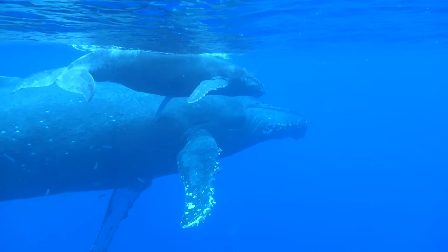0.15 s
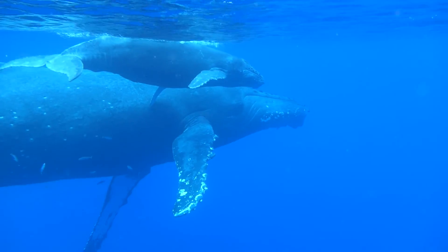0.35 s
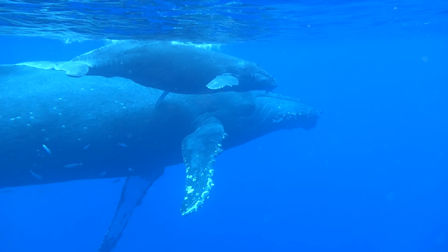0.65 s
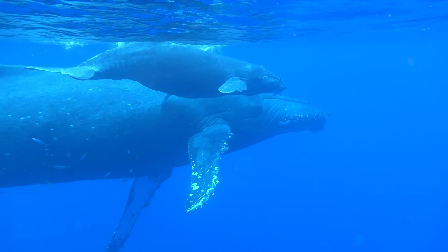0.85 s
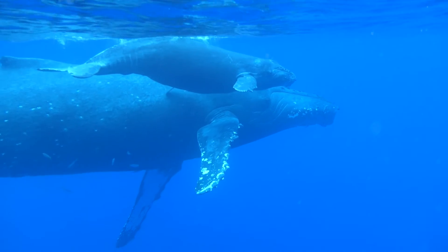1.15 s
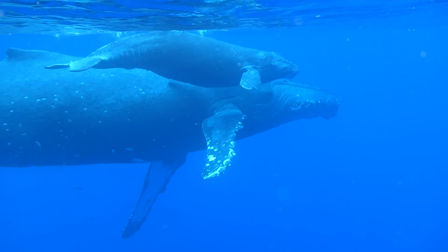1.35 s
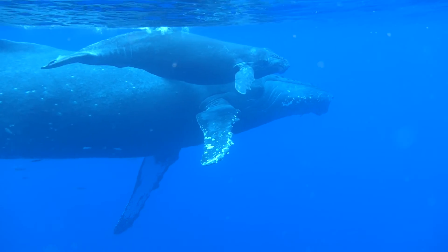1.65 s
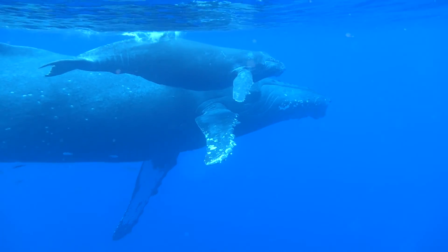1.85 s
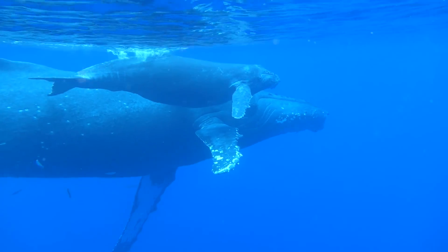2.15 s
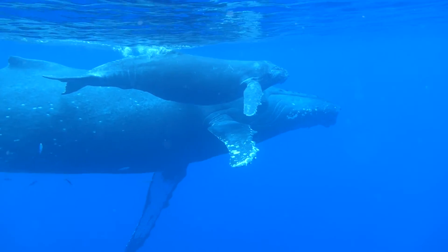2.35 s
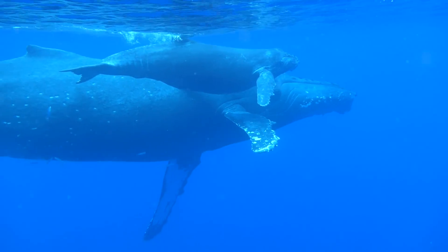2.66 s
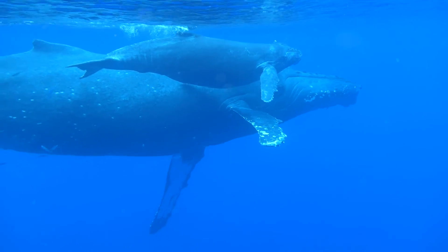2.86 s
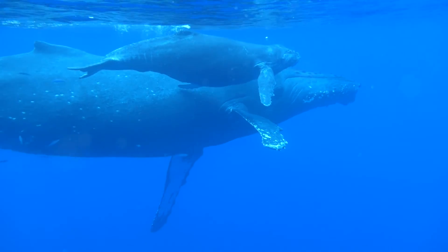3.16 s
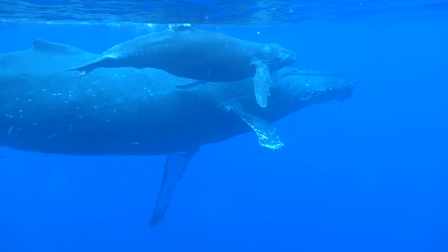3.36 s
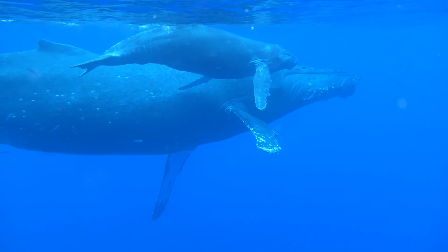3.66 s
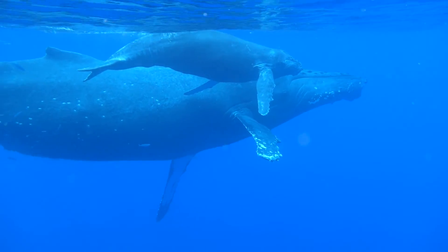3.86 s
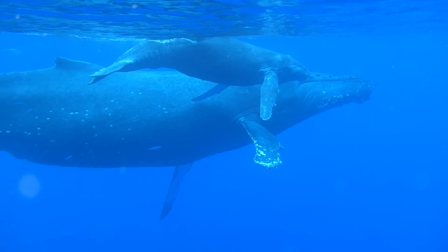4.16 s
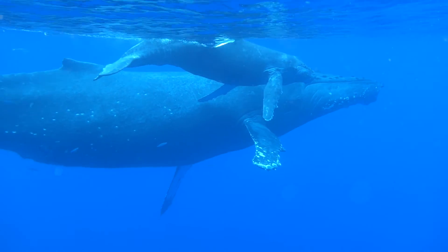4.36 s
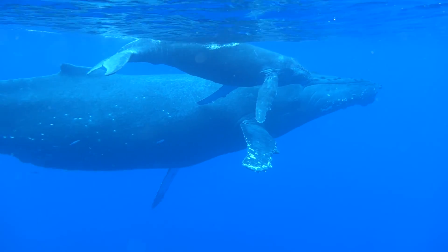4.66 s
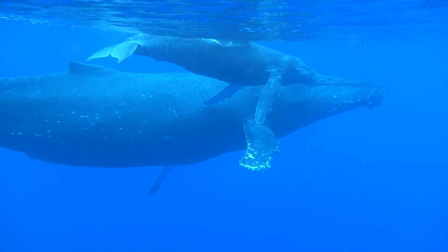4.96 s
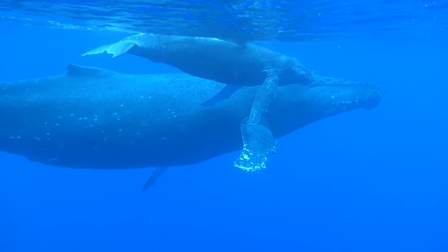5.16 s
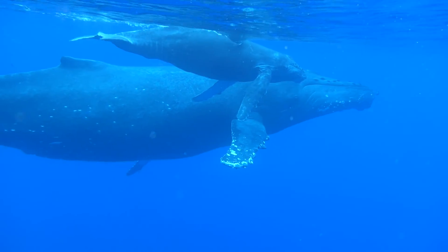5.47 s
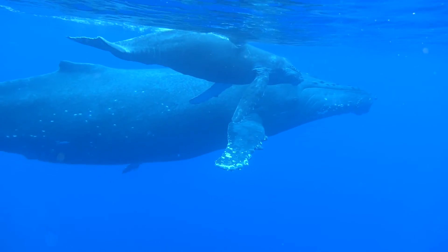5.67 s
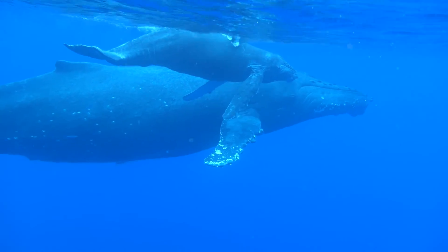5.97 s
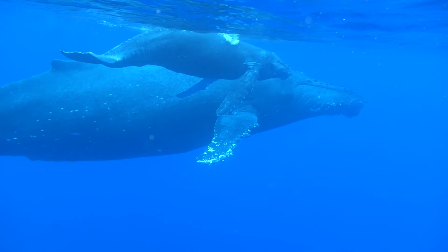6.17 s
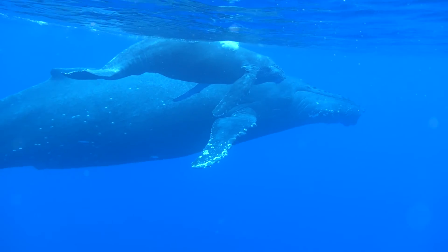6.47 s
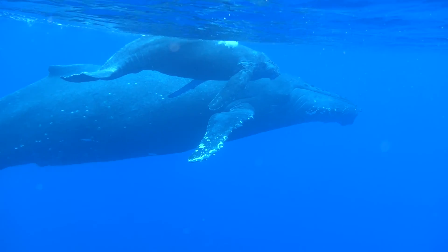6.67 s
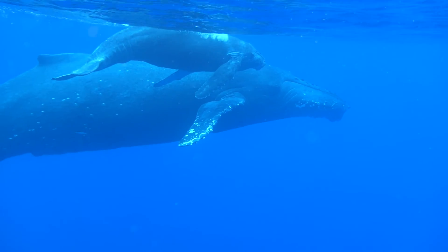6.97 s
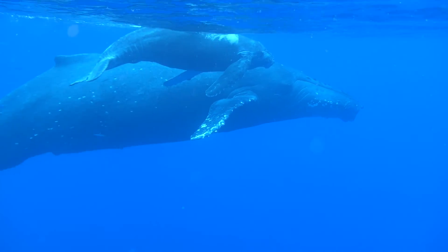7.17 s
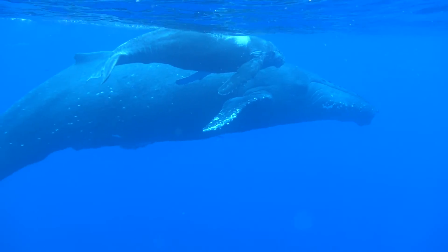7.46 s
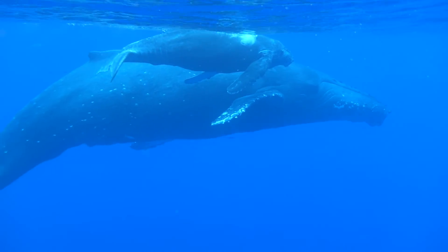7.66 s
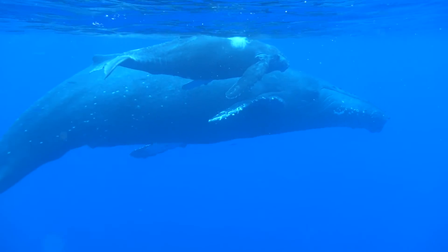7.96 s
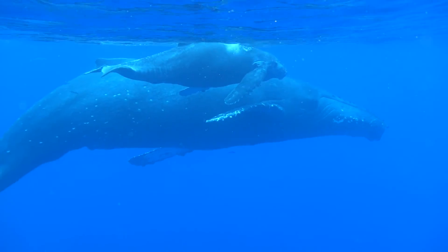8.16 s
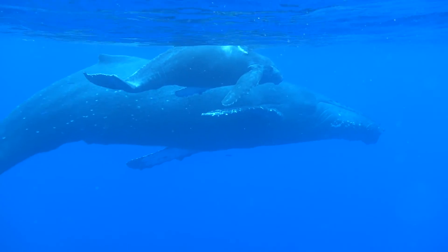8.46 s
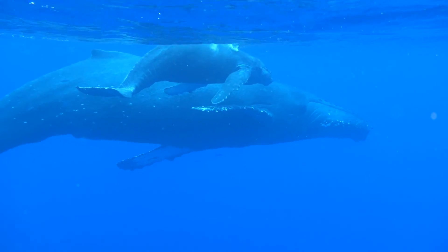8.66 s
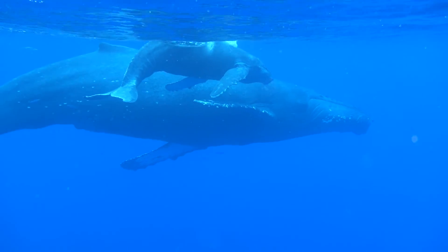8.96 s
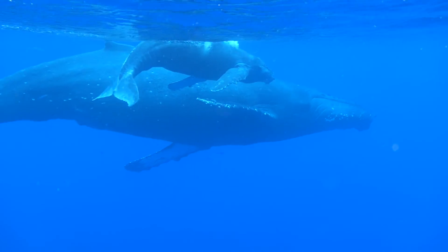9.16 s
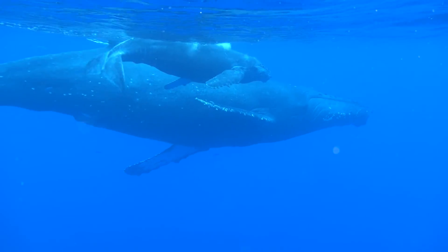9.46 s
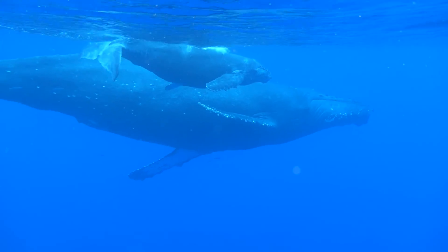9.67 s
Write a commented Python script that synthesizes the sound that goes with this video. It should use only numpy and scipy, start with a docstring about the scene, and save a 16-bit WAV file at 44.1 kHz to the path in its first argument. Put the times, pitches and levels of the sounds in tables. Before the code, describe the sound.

Underwater near the surface, a humpback whale gives a hollow whoop that sweeps upward in steps and turns hoarse at the top. After a gap of dull water knocks and bubble pops, a low pulsing growl speeds into a rattle. Late on, a second rising whoop comes with a faint high cry. Far whale chorus, thin hiss and fine crackle continue throughout, heard through a camera housing.

```python
"""The open sea just below the surface, where humpback whales are heard at a camera housing with two ports.
Behind them lie a far chorus and hiss (shaped noise), laps (noise swells) and a crackle (tiny pings). Water
knocks and burbles on the housing as short decaying rings, and bubbles pop close by. Two whoops glide upward,
their overtones filtered by throat resonances; the second's end is followed by a faint rising echo. Between them
a growl's quickening pulses ring the chest and the mouth. Short echoes follow the whales."""
import sys
import numpy as np
from scipy import signal
from scipy.fft import rfft, irfft, next_fast_len
from scipy.io import wavfile
from scipy.ndimage import uniform_filter1d

SR = 44100
rng = np.random.default_rng(int(sys.argv[2]) if len(sys.argv) > 2 else 0)


def to_wav(sig):
    """Store sig (one row per channel, or 1-D mono) as 16-bit WAV at the path in sys.argv[1].

    Samples outside -1..1 are clipped; the rate is SR.
    """
    pcm = np.clip(np.atleast_2d(sig), -1, 1) * 32767
    pcm = np.round(pcm).astype(np.int16)
    wavfile.write(sys.argv[1], SR, pcm.T)  # frames by channels


N = 433058

# Spectrum of the far chorus. Each row: frequency in Hz, relative density in dB.
CHORUS_SPECTRUM = [(24, -80.5), (40, -34.5), (345, -14.5), (372, -3), (413, -19.5), (453, -5.5),
                   (527, -1.5), (595, -8), (724, -6), (869, -15.5), (1010, -2.5), (1500, -25), (1950, -82),
                   (3300, -120)]
# Favourite notes of the chorus. Each row: frequency in Hz, width in Hz, prominence in dB.
CHORUS_NOTES = [(460.3, 15, 4), (546.7, 22.5, 6), (645, 50, 4.5), (889, 71, -9), (930, 58, 1)]
# Course of the far chorus. Each row: time in seconds, level in dB before swell and fades.
CHORUS_LEVEL = [(0, -36), (1.6, -37), (3.8, -37.5), (6.3, -36.5), (7.2, -38.5), (8.6, -36.5)]
# Brief fades of the background. Each row: deepest point in seconds, depth in dB.
FADES = [(.172, 8), (1.728, 7), (1.975, 9), (3.015, 4), (4.12, 13), (4.172, 6), (6.84, 12), (6.885, 5),
         (6.925, 4), (6.964, 12), (8.94, 5)]
# Spectrum of the hiss. Each row: frequency in Hz, relative density in dB.
HISS_SPECTRUM = [(1880, -10.5), (3200, -6), (3370, -8), (3610, 1.5), (3830, -9), (4370, -5), (4730, -9.5),
                 (5330, -5.5), (6900, -3.5), (9230, -8), (12700, -15), (14900, -17.5), (15600, -22.5)]
# Spectrum of the lapping surface. Each row: frequency in Hz, relative density in dB.
LAPPING_SPECTRUM = [(700, -36), (1050, -2), (1300, 4), (1500, 2.5), (1850, -0.5), (2100, -10.5), (2450, -8),
                    (2750, -8), (3050, -23), (3400, -37), (6000, -42.5)]
# Strongest laps of the surface. Each row: peak time in seconds, level in dB before fades and flutter.
LAPS = [(.21, -44.5), (1.25, -51), (2.01, -54), (2.66, -47), (3.11, -48), (3.66, -50), (3.79, -53),
        (4.54, -49), (6.25, -54), (6.42, -49), (6.47, -57), (6.64, -53), (6.76, -55), (7.14, -59),
        (7.48, -52), (7.85, -42.5), (8.66, -48), (8.86, -51), (8.98, -54), (9.07, -48), (9.79, -49)]
# Ports in a diffuse field. Each row: frequency in Hz, left minus right in dB, phase lead of the
# left in radians, likeness of the two from 0 to 1.
PORTS_FAR = [(100, -3.5, 3.0, 0.6), (210, -3.1, 2.9, 0.41), (320, -5.0, -0.2, 0.47),
             (440, -4.0, -0.7, 0.78), (570, -6.7, -1.0, 0.53), (720, 3.5, 0.1, 0.3), (1000, 4.4, -1.5, 0.8),
             (1250, -2.3, -0.1, 0.68), (1900, -4.5, -2.6, 0.27), (2500, -3.5, -0.0, 0.67),
             (2900, 1.5, 0.9, 0.38), (3550, -4.2, -0.2, 0.47), (5000, -1.6, 0.5, 0.37),
             (9000, 1.0, 0.3, 0.65), (14000, 1.9, 0.1, 0.4)]
# Ports for one direction. Each row: frequency in Hz, left minus right in dB, phase lead of the left in radians.
PORTS_NEAR = [(350, -4.3, -0.1), (600, -4.7, -0.0), (700, -0.5, 0.1), (800, -6.2, -0.7), (970, 4.3, -1.2),
              (1300, -6.8, -1.0), (1620, -13.0, 1.1), (2200, 1.0, -2.7), (2500, -5.1, -0.1),
              (2780, -4.1, 0.9), (3050, -6.4, 1.0), (5200, -2.1, 0.3), (9000, 1.3, 0.3)]
# Transmission of the housing, which passes little bass. Each row: frequency in Hz, gain in dB.
HOUSING = [(40, -33.5), (90, -13.5), (150, 3), (300, -2)]
# Water knocking on the housing. Each row: time in seconds, relative level in dB, ring in Hz.
KNOCKS = [(0.239, -25.5, 360), (2.339, -17, 360), (2.512, -34, 340), (2.531, -26, 344), (2.573, -19, 350),
          (2.827, -27, 370), (2.939, -29, 360), (3.297, -20, 354), (3.327, -30, 340), (3.967, -25, 346),
          (4.428, -29, 340), (6.272, -32.5, 380), (7.152, -30, 340), (7.746, -31.5, 350), (7.781, -29, 347),
          (7.845, -27.5, 380), (8.384, -23.5, 384), (8.545, -24, 314), (8.989, -35, 360),
          (9.064, -35.5, 340)]
# Bubbles popping close by. Each row: start in seconds, relative level in dB, pitch in Hz.
POPS = [(0.7015, -30, 2544), (3.5402, -35, 2540), (3.547, -46, 2470), (3.5527, -37, 2550),
        (3.581, -48, 2470), (3.859, -41.5, 2520), (3.866, -42.5, 1580), (4.89, -33, 2360),
        (7.1527, -43, 2420), (7.206, -40.5, 2450), (8.7223, -43, 2490)]
# Nearest snaps of the crackle. Each row: start in seconds, relative level in dB, centre in Hz.
SNAPS = [(0.6348, -46.5, 9000), (1.591, -49, 10300), (2.744, -48, 3240), (3.539, -45, 3600),
         (3.5523, -43.5, 9300), (3.569, -50, 8400), (4.9801, -46.5, 8650), (5.8843, -49, 8450),
         (6.8813, -54, 10800), (6.972, -50.5, 8100), (7.435, -53, 5200), (7.745, -50, 3900),
         (8.135, -50, 5200), (8.4926, -51, 9250)]
# Echo colour: the rippled surface returns less treble. Each row: frequency in Hz, gain in dB.
ECHO_COLOUR = [(400, 5), (800, -1), (1500, -4.5), (2500, -3), (5000, -6)]
# Faint rising echo of the second whoop's end, made as a wavering tone. Each row: time in seconds, mean pitch in
# Hz, level in dB before flutter.
END_ECHO = [(8.59, 967, -45), (8.63, 1330, -36.5), (8.68, 1610, -50)]
# Pulse rate of the growl, which quickens. Each row: time in seconds, pulses per second.
GROWL_RATE = [(4.583, 19.5), (4.787, 19.5), (4.984, 21.1), (5.134, 32.2), (5.35, 32.6), (5.637, 37.1),
              (5.805, 46.2), (5.887, 51.4), (5.942, 57.7), (6.09, 62)]
# Growl resonances: the chest sags, then turns up towards the mouth. Each row: time in seconds,
# chest in Hz, chest level in dB, mouth in Hz, mouth level in dB.
GROWL_RESONANCES = [(4.58, 256, -77, 380, -45.5), (4.78, 243, -74, 372, -44),
                    (4.86, 231, -64.5, 374, -39.5), (4.98, 223, -52, 397, -39), (5.2, 214, -55, 413, -46),
                    (5.42, 224, -47, 444, -54.5), (5.6, 202, -47.5, 450, -61), (5.73, 220, -44.5, 458, -49),
                    (5.81, 250, -40, 460, -50), (5.89, 312, -39, 470, -44), (5.97, 380, -42.5, 462, -38.5),
                    (6.09, 440, -54, 510, -48)]
# Effort of the growl: it builds, peaks in a last push and lets go. Each row: time in seconds,
# effort in dB, level of the low throat resonance in dB.
GROWL_EFFORT = [(4.58, -24, -70), (4.75, -18, -54), (4.79, -9, -50), (4.98, -8, -58), (5.25, -5, -62),
                (5.47, -5, -42), (5.56, -4.5, -56), (5.72, -8, -53), (5.85, 3, -52.5), (5.98, -2, -53),
                (6.05, -28, -72)]
# Cracks of the hardest pulses. Each row: start in seconds, level in dB.
GROWL_CRACKS = [(5.385, -50), (5.584, -42), (5.807, -41), (5.851, -45), (5.872, -51)]
# Colour of the growl's rattle. Each row: frequency in Hz, gain in dB.
RATTLE_COLOUR = [(100, -24), (220, 12.5), (450, 19), (850, 6), (1200, 12.5), (1620, -14), (2050, -4.5),
                 (2500, 11.5), (2780, -9), (3030, 3.5), (3400, -25), (4400, -19), (5150, -15.5),
                 (5800, -22), (12000, -34)]
# Two whoops, each climbing to a ledge, leaping and breaking upward once more. Each row: time in seconds,
# mean pitch in Hz, relative fundamental in dB, then the relative overtones in dB in the low, middle
# and high throat resonance.
FIRST_WHOOP = [(0.25, 155.5, -59, -57.5, -59, -70), (0.31, 188.8, -47.5, -49.5, -64, -69),
               (0.365, 223, -36.5, -43.5, -49, -67), (0.425, 277.5, -36, -42.5, -52, -62),
               (0.46, 304.4, -30, -57, -53, -62), (0.495, 320.8, -30, -47.5, -49.5, -63),
               (0.595, 323.5, -30, -58.5, -55, -56), (0.622, 337.6, -31, -45, -53, -55),
               (0.645, 352.3, -24, -48, -57, -64), (0.69, 404.3, -22.5, -54.5, -55, -63),
               (0.748, 492.4, -22, -44.5, -64.5, -66), (0.775, 593.3, -29, -47, -52, -70.5),
               (0.808, 614.7, -20.5, -48, -41, -65), (0.86, 639, -24, -48, -49, -72),
               (0.915, 664.7, -20, -51.5, -56, -72), (0.948, 702, -22.5, -50, -51, -65),
               (0.965, 769, -31.5, -51.5, -49.5, -64), (1.003, 827, -34, -51.5, -45.5, -64),
               (1.03, 958, -30.5, -52, -54, -63), (1.08, 988, -38.5, -48.5, -68, -74)]
SECOND_WHOOP = [(7.86, 150.2, -65, -46, -68, -74), (7.915, 196.7, -52.5, -56, -68, -73),
                (7.945, 213.7, -45.5, -43, -52, -64), (7.98, 226, -39, -47.5, -57, -62),
                (8.045, 276, -37, -45, -56, -62), (8.12, 297.7, -33, -52.5, -62, -61),
                (8.16, 298.2, -31.5, -50, -61, -73), (8.215, 317.5, -26, -53, -54.5, -67),
                (8.286, 411.3, -14.5, -42.5, -64, -64), (8.303, 525, -32.5, -41.5, -47.5, -53),
                (8.335, 587, -28.5, -43, -47, -51), (8.385, 619, -22, -47.5, -50, -49),
                (8.441, 661, -24, -41.5, -40, -59), (8.452, 756, -28, -46, -50, -53),
                (8.475, 772, -28.5, -44, -54, -43.5), (8.508, 791, -37, -49.5, -48.5, -56),
                (8.535, 901, -28.5, -51, -47.5, -55), (8.565, 941, -46.5, -72, -59, -62),
                (8.605, 990, -38, -56, -57, -60), (8.67, 1035, -52, -54.5, -58, -61)]
# Treble ring of the whoops. Each row: time in seconds, relative level in dB.
TREBLE_RING = [(.3, -75), (.42, -74), (.5, -67), (.62, -70), (.74, -75), (1.05, -72.5), (8.22, -74),
               (8.35, -65), (8.5, -67.5), (8.62, -73)]
# Hoarseness of the voice. Each row: pitch in Hz, roughness from 0 to 1.
ROUGHNESS = [(170, .7), (240, .5), (310, .04), (335, .05), (420, .3), (530, .3), (610, .03), (745, .06),
             (830, .55), (950, .85)]
# Throat's low, middle and high resonance, then its treble ring. Each row: lower edge in Hz, upper edge in Hz.
THROAT_BANDS = [(800, 2050), (2050, 2800), (2800, 3700), (4400, 5700)]
# Colour of the overtones. Each row: frequency in Hz, gain in dB.
THROAT_COLOUR = [(100, -27), (330, -10), (470, -8), (620, 4), (900, -3.5), (1300, 1), (1620, -1),
                 (1850, -14.5), (2050, -17), (2500, -1.5), (2780, -15.5), (3050, -6.5), (3330, -32),
                 (3800, -28), (4300, -17.5), (4700, -23), (5200, -15.5), (6000, -25.5), (12000, -25)]
# Colour of the rasp, on top of the throat's. Each row: frequency in Hz, gain in dB.
RASP_COLOUR = [(300, 2), (1500, 0.5), (2500, 1), (3100, -11.5), (5000, -2)]

CHORUS_SWELL_DB, SWELL_HZ = -0.13, 4.6  # slight random swell of the far chorus
HISS_DB = -63.5  # before fades
CALM_DB = -53.5  # the surface between laps, before fades and flutter
LAP_RISE_S, LAP_FALL_S = 0.013, 0.014
FLUTTER_DB, FLUTTER_HZ = 2, 44.8  # ripples make the lapping flutter
SINK_S, RETURN_S = 0.028, 0.0059  # a fade sinks more slowly than it returns
FAR_FLUTTER_DB = 3  # of the rising echo
SURFACE_DELAY_S = 0.022  # surface echo after the direct sound
EDGE_HZ = 15550


def amp(db):
    """Decibel law: gain is ten to the power of dB over twenty."""
    return 10 ** (np.asarray(db) / 20)


def unit(x):
    """Normalization: the rms is scaled to 1."""
    return x / np.sqrt(np.mean(x ** 2) + 1e-20)


def read(points, hz, index=1):
    """Interpolation of one spectrum column along a logarithmic frequency axis."""
    columns = np.transpose(points)
    return np.interp(np.log(hz + 1), np.log(columns[0] + 1), columns[index])


def curves(rows, t):
    """Linear interpolation in time of every column of a table."""
    s, *columns = np.transpose(rows)
    return [np.interp(t, s, c) for c in columns]


def add(mix, s, sound):
    """Superposition: a sound is summed into the mix from time s."""
    part = mix[max(round(s * SR), 0):][:len(sound)]
    part += sound[:len(part)]


def colour(x, points):
    """Linear filtering: the spectrum is multiplied by a gain curve in dB."""
    size = next_fast_len(len(x))
    gain = amp(read(points, np.fft.rfftfreq(size, 1 / SR)))
    return irfft(rfft(x, size) * gain, size)[:len(x)]


def band(x, low_hz, high_hz):
    """Band-pass filtering with steep edges and no phase shift."""
    sos = signal.butter(5, [low_hz, high_hz], "band", fs=SR, output="sos")
    return signal.sosfiltfilt(sos, x)


def wander(size, rate_hz):
    """Random modulation: Gaussian low-passed noise, set to rms 1 before it is cut to size."""
    length = 2 ** int(size).bit_length()
    hz = np.fft.rfftfreq(length, 1 / SR)
    smooth = rfft(rng.standard_normal(length)) * np.exp(-(hz / rate_hz) ** 2)
    return unit(irfft(smooth))[:size]


def steady(x, size, slack=0):
    """Level control: division by the running rms; with slack, quiet stretches stay quieter."""
    power = abs(uniform_filter1d(x ** 2, size))
    return x / np.sqrt(power + slack * np.mean(x ** 2) + 1e-12)


def hump(t, s, rise_s, fall_s):
    """Gaussian envelope of height 1 at time s, with its own rise and fall."""
    return np.exp(-((t - s) / np.where(t < s, rise_s, fall_s)) ** 2)


def ping(hz, rise_s, noisy):
    """Damped oscillation: it swells to a peak at rise_s and decays; noisy is phase wander in radians."""
    t = np.arange(SR // 16) / SR
    phase_wander = noisy * wander(len(t), hz / 3) if noisy else 0
    envelope = ((t / rise_s) * np.exp(1 - t / rise_s)) ** 2
    return np.sin(2 * np.pi * hz * t + phase_wander) * envelope


def port_pair(table, hz):
    """Interaural principle: level and phase differences, split evenly between left and right ports."""
    half = amp(read(table, hz) / 2) * np.exp(.5j * read(table, hz, index=2))
    return np.array([half, 1 / half])


def diffuse(shape, patchy_db, flicker_db, size=4):
    """Diffuse field: partly coherent two-port noise with drifting spectral patches and a shared flicker."""
    frames, hz = N // 512 + 5, np.fft.rfftfreq(2048, 1 / SR)
    a, b, c, d, patches = rng.standard_normal((5, frames, len(hz)))
    patches = uniform_filter1d(patches, size=8, axis=0)
    patches = unit(uniform_filter1d(patches, size=5, axis=1))
    flicker = unit(uniform_filter1d(rng.standard_normal(frames), size=size))[:, None]
    same = np.clip(read(PORTS_FAR, hz, index=3), 0, 1)
    left, other = a + 1j * b, c + 1j * d
    z = np.array([left, same * left + np.sqrt(1 - same ** 2) * other])
    level_db = shape(hz) + patchy_db * patches + flicker_db * flicker
    z *= port_pair(PORTS_FAR, hz)[:, None] * amp(level_db)
    _, noise = signal.istft(z.swapaxes(1, 2), nperseg=2048, noverlap=1536)
    return unit(noise[:, :N])


def chorus_shape(hz):
    """Spectral superposition: far song smeared into a wash, with favourite notes as Gaussian peaks."""
    notes = sum(db * np.exp(-2 * ((hz - f) / width) ** 2) for f, width, db in CHORUS_NOTES)
    return read(CHORUS_SPECTRUM, hz) + notes


def far_chorus(t, fade_db):
    """Many distant voices sum to shaped noise, whose level follows a slow course and the fades."""
    level_db = curves(CHORUS_LEVEL, t)[0] + CHORUS_SWELL_DB * wander(N, SWELL_HZ) - fade_db
    return amp(level_db) * diffuse(chorus_shape, patchy_db=2.0, flicker_db=1.36)


def lapping_surface(t, fade_db):
    """Amplitude modulation: each lap is a short swell of shaped noise, and ripples make it flutter."""
    laps = sum(amp(db) * hump(t, s, LAP_RISE_S, LAP_FALL_S) for s, db in LAPS)
    noise = diffuse(lambda hz: read(LAPPING_SPECTRUM, hz), patchy_db=4.5, flicker_db=2, size=2)
    level = (laps + amp(CALM_DB)) * amp(-fade_db)
    return level * noise * amp(FLUTTER_DB * wander(N, FLUTTER_HZ))


def fine_hiss(fade_db, fade_share=0.34):
    """Shaped noise of nearly even level, which takes only a share of the fades."""
    noise = diffuse(lambda hz: read(HISS_SPECTRUM, hz), patchy_db=3.0, flicker_db=1.5)
    return amp(HISS_DB - fade_share * fade_db) * noise


def open_sea():
    """Superposition of far chorus, lapping surface and hiss under common brief fades."""
    t = np.arange(N) / SR
    fade_db = sum(db * hump(t, s, SINK_S, RETURN_S) for s, db in FADES)
    return far_chorus(t, fade_db) + lapping_surface(t, fade_db) + fine_hiss(fade_db)


def crackle(per_s=400, level_db=-74, spread_db=5.0):
    """Shot noise: countless very short snaps, each with its own random pitch and size."""
    out = np.zeros(N)
    for when, pitch, chance in rng.random((int(per_s * N / SR), 3)):
        size_db = spread_db * min(-np.log(1 - chance), 4)
        hz = 6000 * 1.9 ** pitch
        add(out, when * N / SR, amp(size_db) * ping(hz, rise_s=1.6 / hz, noisy=0))
    return amp(level_db) * unit(out)


def burble(per_s, level_db, spread_db, low_hz, high_hz):
    """Bubble resonance: small bubbles and gulps around the housing ring briefly at random times."""
    out = np.zeros(N)
    for when, pitch, chance in rng.random((int(per_s * N / SR), 3)):
        size_db = spread_db * min(-np.log(1 - chance), 3)
        hz = low_hz * (high_hz / low_hz) ** pitch
        add(out, when * N / SR, amp(level_db + size_db) * ping(hz, rise_s=1.4 / hz, noisy=0))
    return out


def knock(hz, rise_s=0.0042, slosh_db=-11, slosh_s=.012):
    """Impact excitation: a dull damped ring of the housing with a decaying noise slosh of water."""
    thump = ping(hz, rise_s, noisy=.3)
    t = np.arange(len(thump)) / SR
    slosh = unit(band(rng.standard_normal(SR), 170, 800))[SR // 2:][:len(t)]
    return thump + amp(slosh_db) * slosh * np.minimum(t / rise_s, 1) * np.exp(-t / slosh_s)


def near_water(pop_db=1, snap_db=2):
    """Transient resonance: dull knocks on the housing, bubble pops and sharp snaps."""
    out = np.zeros(N)
    for s, db, hz in KNOCKS:
        add(out, s + .001, amp(db) * knock(hz))
    for s, db, hz in POPS:
        add(out, s, amp(db + pop_db) * ping(hz, rise_s=0.0033, noisy=0.34))
    for s, db, hz in SNAPS:
        add(out, s, amp(db + snap_db) * ping(hz, rise_s=0.002, noisy=1.13))
    return out


def sea_echoes(x, surface_db=-6.0, wet_db=-16, t60=0.43):
    """Reflection: one strong surface return beats against gliding notes; a thin scattered tail decays."""
    t = np.arange(SR) / SR
    taps = rng.standard_normal(SR) * (rng.random(SR) < 2000 / SR) * (t > .012)
    tail = taps * amp(-60 * t / t60)
    response = amp(wet_db) * tail / np.linalg.norm(tail)
    add(response, SURFACE_DELAY_S, amp([surface_db]))
    return x + colour(signal.fftconvolve(x, response)[:N], ECHO_COLOUR)


def ports(x):
    """Directional reception: sound from one direction has its own level and phase at each port."""
    size = next_fast_len(N)
    gains = port_pair(PORTS_NEAR, np.fft.rfftfreq(size, 1 / SR))
    return irfft(rfft(x, size) * gains, size)[:, :N]


def wavering_tone(rows):
    """Frequency modulation: a far, wavering, nearly pure tone with a fluttering level."""
    t = np.arange(rows[0][0], rows[-1][0], 1 / SR)
    hz, level_db = curves(rows, t)
    turns = np.cumsum(hz * (1 + .012 * wander(len(t), 45))) / SR
    level = amp(level_db + FAR_FLUTTER_DB * wander(len(t), 25))
    return t[0], level * np.sin(2 * np.pi * turns) * signal.windows.tukey(len(t), .1)


def ring(drive, hz, width_hz):
    """Resonance: a steep two-pole filter, shifted in frequency to follow a pitch curve."""
    turn = np.exp(2j * np.pi * np.cumsum(hz) / SR)
    r = np.exp(-np.pi * width_hz / SR)
    return (turn * signal.lfilter([1], [1, -2 * r, r * r], drive / turn)).real


def bright_rms(x, size):
    """Running rms of the throat's upper resonance."""
    sos = signal.butter(3, [2200, 3400], "band", fs=SR, output="sos")
    return np.sqrt(abs(uniform_filter1d(signal.sosfiltfilt(sos, x) ** 2, size)) + 1e-12)


def growl(rattle_db=-48.0, chest_width_hz=42, mouth_width_hz=50, tick_db=-70, crack_hz=5150):
    """Pulse excitation: quickening pulses ring chest and mouth and rattle the throat; hard ones crack."""
    t = np.arange(GROWL_RATE[0][0], GROWL_RATE[-1][0], 1 / SR)
    rate, = curves(GROWL_RATE, t)
    chest_hz, chest_db, mouth_hz, mouth_db = curves(GROWL_RESONANCES, t)
    effort_db, body_db = curves(GROWL_EFFORT, t)

    # each pulse has its own strength: a click and a decaying puff of noise
    turns = np.cumsum(rate) / SR
    pulse = turns.astype(int)
    strength = amp(2.2 * rng.standard_normal(200).clip(-2, 2))[pulse]
    age_s = (turns % 1) / rate
    beats = unit(np.diff(pulse, prepend=0) * strength)
    puffs = unit(strength * (.2 + np.exp(-age_s / .0065)) * rng.standard_normal(len(t)))
    low_drive = beats + .22 * puffs
    high_drive = .4 * beats + puffs

    chest = amp(chest_db) * steady(ring(low_drive, chest_hz, chest_width_hz), size=4400)
    mouth = amp(mouth_db) * steady(ring(low_drive, mouth_hz, mouth_width_hz), size=4400)
    rattle = colour(high_drive, RATTLE_COLOUR)
    rattle = rattle / bright_rms(rattle, size=5000)
    body = steady(band(high_drive, 1350, 1800), size=5000)  # low throat resonance
    ticks = unit(band(puffs * strength * np.exp(-age_s / .002), 4600, 5700))
    throat = amp(rattle_db) * rattle + amp(tick_db) * ticks
    voice = chest + mouth + amp(effort_db) * throat + amp(body_db) * body
    for s, db in GROWL_CRACKS:
        add(voice, s - t[0], amp(db) * ping(crack_hz, rise_s=0.00098, noisy=0.63))
    return t[0], voice * signal.windows.tukey(len(t), .05)


def whoop(rows, tone_db, overtones_db, second_db):
    """Source and filter: a gliding fundamental with overtones in throat bands, hoarse where pitch is rough."""
    t = np.arange(rows[0][0], rows[-1][0], 1 / SR)
    hz, level_db, *resonances_db = curves(rows, t) + curves(TREBLE_RING, t)
    rough = np.clip(read(ROUGHNESS, hz), 0, 1)
    turns = np.cumsum(hz * (1 + (.001 + .03 * rough) * wander(len(t), 60))) / SR

    folds = np.zeros(len(t))
    for k in range(2, 26):  # each overtone flutters on its own
        phase = 2 * np.pi * k * turns + .25 * wander(len(t), 60)
        folds += np.cos(phase) * amp(4.5 * wander(len(t), 30))
    rasp = (0.13 + np.exp(-(turns % 1) / 0.42)) * rng.standard_normal(len(t))  # one puff a cycle
    clean = colour(folds, THROAT_COLOUR)
    hoarse = colour(colour(rasp, THROAT_COLOUR), RASP_COLOUR)

    upper = np.zeros(len(t))
    for db, (low, high) in zip(resonances_db, THROAT_BANDS):
        for source, share in [(clean, 1 - rough), (hoarse, rough)]:
            resonance = steady(band(source, low, high), size=2600, slack=0.14)
            upper += amp(db) * np.sqrt(share) * resonance

    low_voice = np.interp(hz, [245, 290], [1, 0])
    octave = amp(second_db) * low_voice * np.cos(4 * np.pi * turns)  # strong in the low voice
    tone = np.sin(2 * np.pi * turns) + octave
    tone *= 1 + .7 * rough * wander(len(t), 70)
    voice = amp(level_db + tone_db) * tone + amp(overtones_db) * upper
    return t[0], voice * signal.windows.tukey(len(t), .05)


def scene():
    """Superposition of the open sea, the near water and the whales with their echoes."""
    sea = open_sea()
    gulps = burble(per_s=9, level_db=-52.5, spread_db=5.0, low_hz=288, high_hz=483)
    fizz = burble(per_s=45, level_db=-53, spread_db=3.0, low_hz=1320, high_hz=2690)
    water = crackle() + gulps + fizz + near_water()
    whales = np.zeros(N)
    add(whales, *wavering_tone(END_ECHO))
    add(whales, *growl())
    add(whales, *whoop(FIRST_WHOOP, tone_db=4.5, overtones_db=5.5, second_db=0.0))
    add(whales, *whoop(SECOND_WHOOP, tone_db=4.5, overtones_db=3.5, second_db=2.5))
    return sea + ports(colour(sea_echoes(whales) + water, HOUSING))


def record(dry):
    """Band limitation: the camera's steep low-pass filter, of linear phase."""
    low_pass = signal.firwin(511, EDGE_HZ, window=("kaiser", 9), fs=SR)
    return signal.oaconvolve(dry, low_pass[None], "same")


dry = scene()
out = record(dry)
to_wav(out)
```